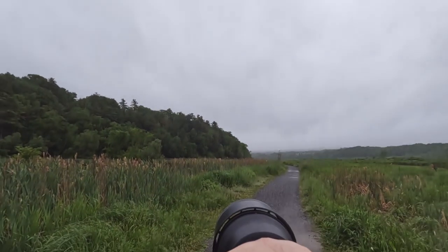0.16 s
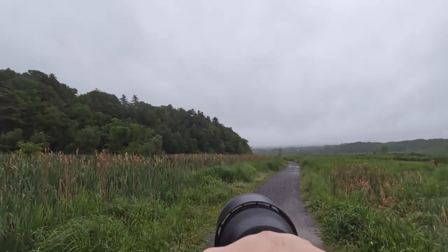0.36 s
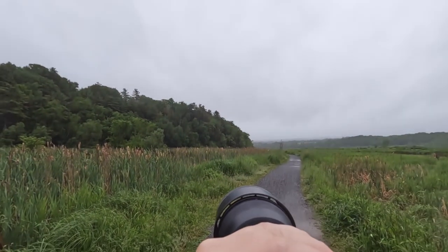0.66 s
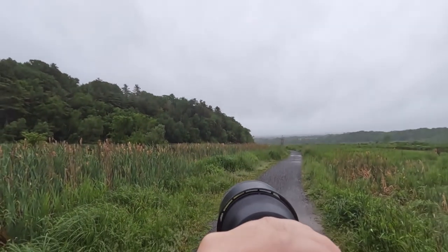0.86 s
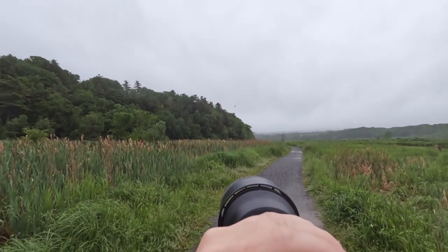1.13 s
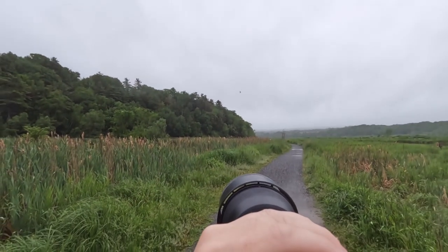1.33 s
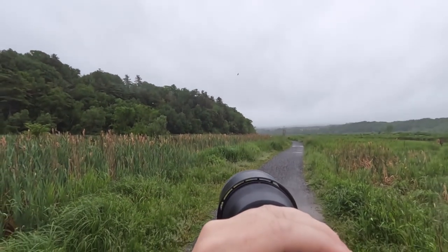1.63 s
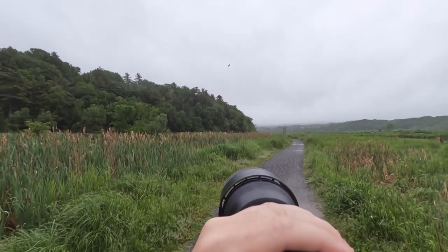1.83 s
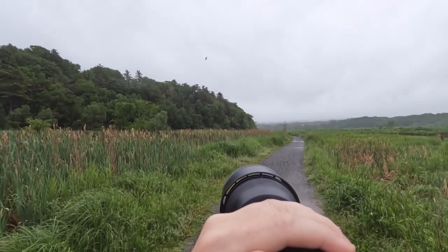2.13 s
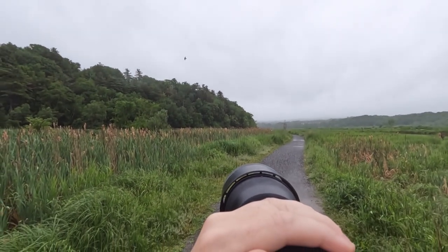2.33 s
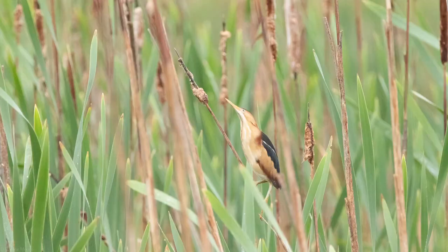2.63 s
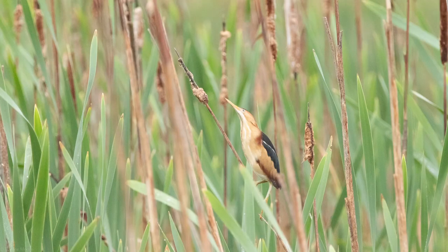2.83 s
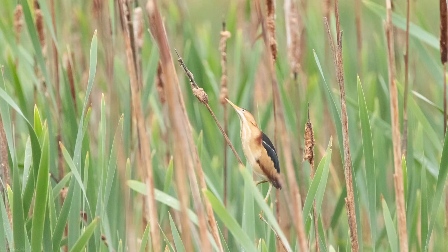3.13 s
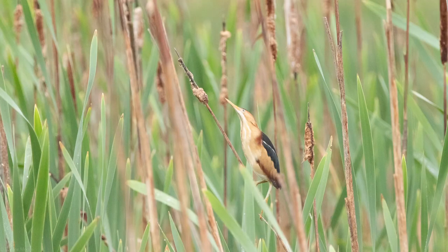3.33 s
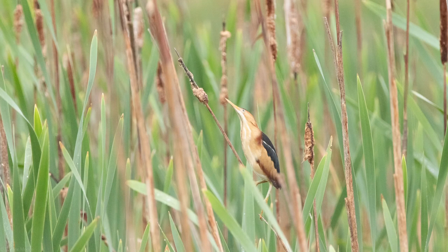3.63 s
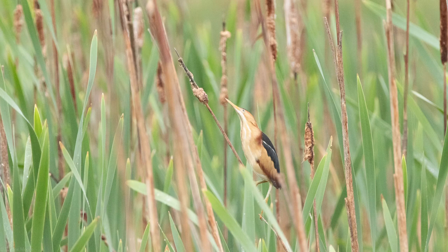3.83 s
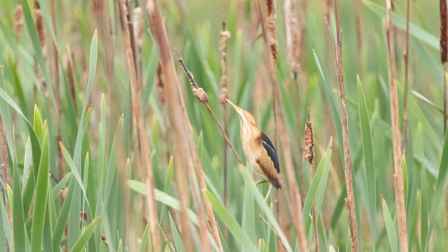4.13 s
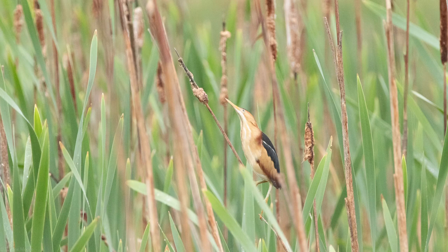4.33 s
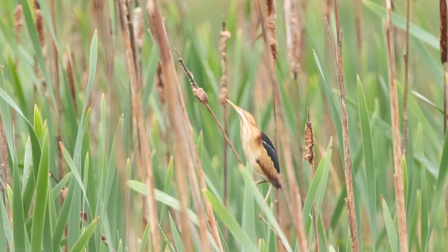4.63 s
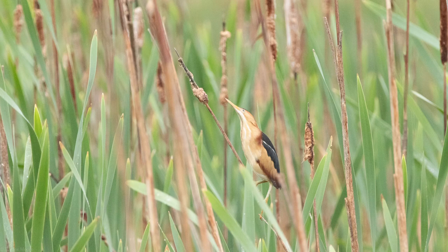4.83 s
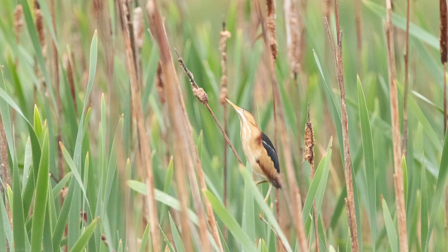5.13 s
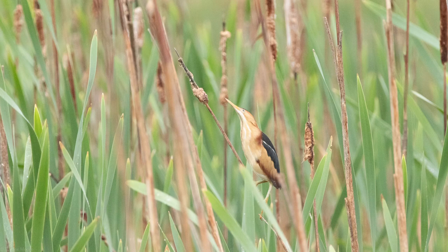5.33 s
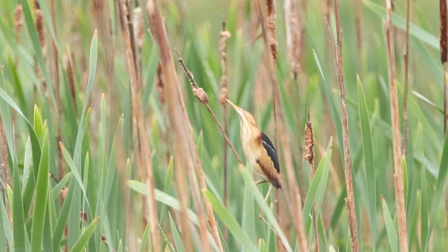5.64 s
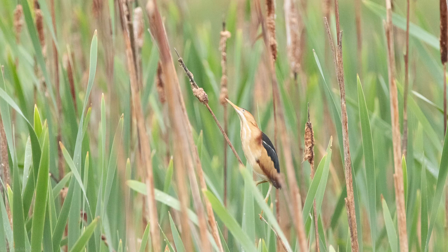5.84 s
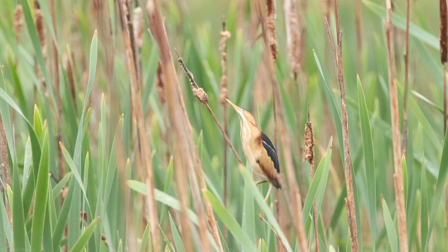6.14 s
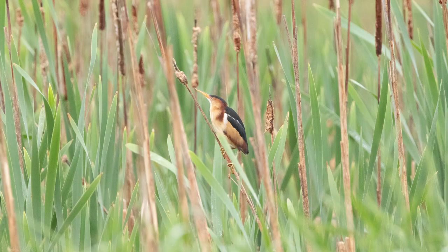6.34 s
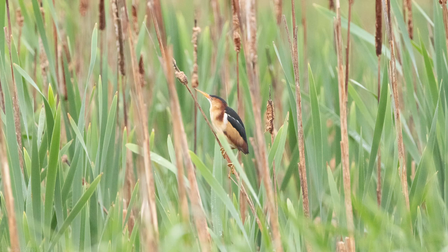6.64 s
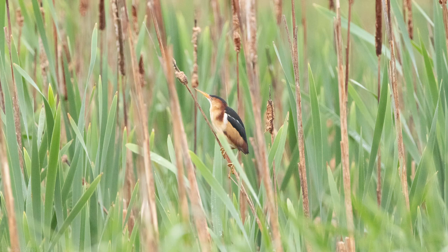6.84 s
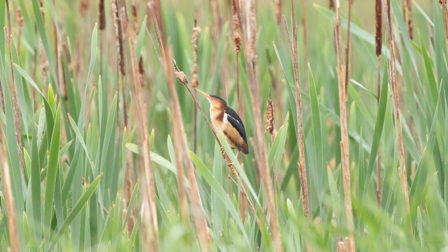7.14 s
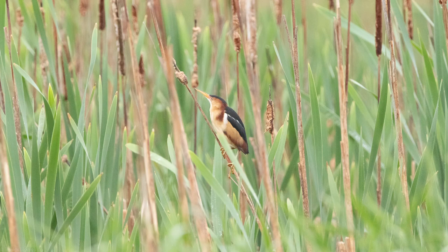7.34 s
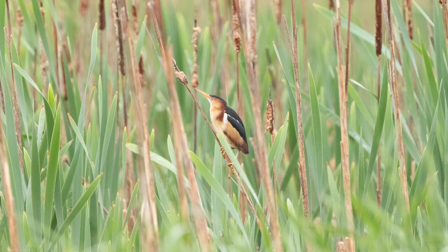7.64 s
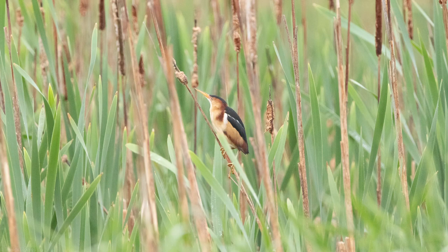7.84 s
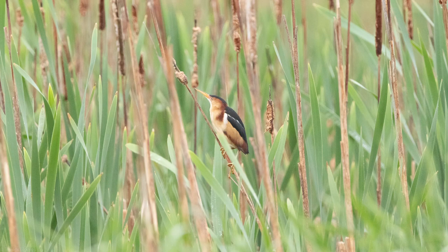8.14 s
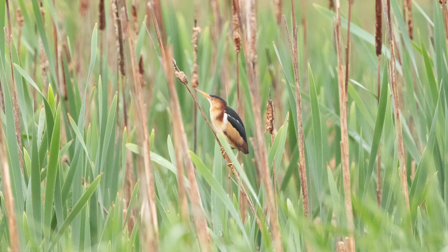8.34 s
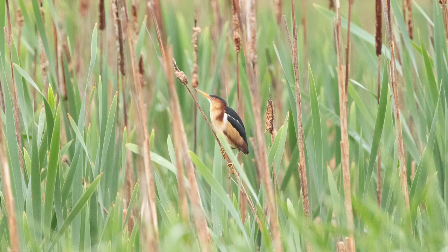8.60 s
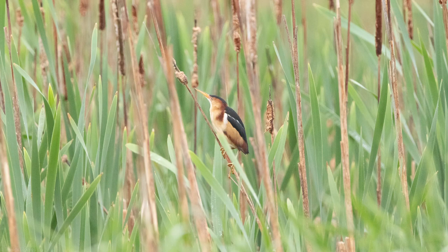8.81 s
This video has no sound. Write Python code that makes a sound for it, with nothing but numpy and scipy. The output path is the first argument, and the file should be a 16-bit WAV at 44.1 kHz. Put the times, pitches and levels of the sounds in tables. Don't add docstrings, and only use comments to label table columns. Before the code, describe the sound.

A quiet, breezy marsh with far birdsong blurred by reeds and trees. A frog's plucked twang sits on the left, opening the scene, then again at two seconds and briefly after four. A close camera fires twice, each a click followed by a fast metallic-plastic clatter and motor whirr. Blackbird trills follow each shot, a warbler repeats falling notes around five seconds, and low wind buffets thump on the microphones.

```python
import sys
import numpy as np
from scipy import signal
from scipy.fft import rfft, irfft
from scipy.io import wavfile
from scipy.ndimage import uniform_filter1d

SR = 44100
rng = np.random.default_rng(int(sys.argv[2]) if len(sys.argv) > 2 else 0)


def convert_level_to_amplitude(level_db):
    exponent = np.asarray(level_db, float) / 20
    return 10 ** exponent


def file_out(sig):
    cols = np.atleast_2d(sig).T
    lim = np.clip(cols, -1, 1)
    pcm = np.round(lim * 32767).astype(np.int16)
    wavfile.write(sys.argv[1], SR, pcm)


N = 395577

# [t/s, reeds level/dB, blackbirds level/dB, warblers level/dB]
FAR_LEVELS = [(0.0, -49.5, -62, -56.5), (0.37, -64, -67, -54), (1.0, -64, -70, -62), (1.75, -66, -75, -71),
              (2.65, -63.5, -64, -61.5), (3.3, -66, -72.5, -61), (3.72, -65.5, -76.5, -67.5),
              (4.1, -66.5, -79, -64), (4.3, -66, -67, -65), (5.3, -66.5, -72, -66),
              (6.0, -65, -69.5, -65.5), (6.62, -65.5, -64, -58.5), (7.3, -66.5, -73, -65),
              (7.82, -65.5, -75.5, -68.5), (8.5, -65.5, -74, -70), (8.97, -65, -75.5, -69.5)]


def unit(x):
    return x / np.sqrt(np.mean(x ** 2))


def seconds(length):
    return np.arange(int(length * SR)) / SR


def add(out, x, s):
    i = int(s * SR)
    out[..., i:i + x.shape[-1]] += x[..., :N - i]


def pan(x, pan_db):
    return x * convert_level_to_amplitude(np.array([[pan_db], [-pan_db]]) / 2)


def band(x, lo_hz, hi_hz, order=2):
    return signal.sosfilt(signal.butter(order, [lo_hz, hi_hz], "band", fs=SR, output="sos"), x)


def colour(points, size=1024):
    hz, db = np.transpose(points)
    bins_hz = np.arange(size // 2 + 1) * SR / size
    ceps = irfft(np.log(convert_level_to_amplitude(np.interp(np.log(bins_hz + 1), np.log(hz), db))))
    ceps[1:size // 2] *= 2
    ceps[size // 2 + 1:] = 0
    return irfft(np.exp(rfft(ceps)))


def ring(modes, scatter_db, rise):
    t = seconds(.03)
    out = 0
    for hz, width, db in modes:
        gain = convert_level_to_amplitude(db + scatter_db * rng.standard_normal((2, 1)))
        decay = np.exp(-np.pi * max(width, 90) * t)
        out = out + gain * decay * np.sin(2 * np.pi * (hz * t + rng.random()))
    out = out * (1 - np.exp(-(t / rise) ** 2))
    return out / abs(out).max()


def walk(rate):
    k = int(SR / rate)
    steps = np.repeat(rng.standard_normal(N // k + 1), k)
    return unit(uniform_filter1d(uniform_filter1d(steps, k), k)[:N])


def flicker(count, rate):
    k = int(SR / rate)
    return uniform_filter1d(uniform_filter1d(rng.standard_normal(count), k), k) * np.sqrt(1.6 * k)


def stereo_noise(likeness, count):
    mid, side = rng.standard_normal((2, count))
    c = np.clip(likeness, 0, 1)
    return (np.sqrt(1 + c) * mid + np.sqrt(1 - c) * side * np.array([[1], [-1]])) / np.sqrt(2)


def curves(rows):
    s, *columns = np.transpose(rows)
    return [np.interp(np.arange(N) / SR, s, c) for c in columns]


def note(hz, db, edge, wobble=.006, twinkle_db=3.5):
    twinkle = convert_level_to_amplitude(twinkle_db * min(hz[0] / 4000, 1) ** 2 * flicker(len(hz), 160))
    shape = signal.windows.tukey(len(hz), np.clip(edge, .05, 1)) * twinkle
    phase = 2 * np.pi * np.cumsum(hz * (1 + wobble * flicker(len(hz), 120))) / SR
    return convert_level_to_amplitude(db) * np.sqrt(2) * shape * np.sin(phase)


def reed_scatter(decay):
    t = seconds(4 * decay)
    reeds = rng.standard_normal(len(t)) * np.exp(-t / decay)
    return reeds / np.sqrt(np.sum(reeds ** 2))


def sing(out, s, hz, db, wobble=0.0058):
    voice = note(hz, db, 0.4, wobble=wobble)
    add(out, .8 * voice, s)
    add(out, .6 * signal.fftconvolve(voice, reed_scatter(.01)), s)


def fall(top_hz, length, drop):
    return top_hz * np.exp(-drop * seconds(length))


def marsh():
    # [f/Hz, level/dB per Hz]
    floor_points = [(88, -30), (150, 0), (206, -3), (298, -10.5), (374, -5), (551, -12.5), (1300, -10),
                    (2250, -20), (3800, -22.5), (5900, -29.5), (7550, -40), (10000, -58), (13000, -88),
                    (22000, -120)]
    points_hz, points_db = np.transpose(floor_points)
    layers = np.zeros((3, 2, N))
    for hz in 180 * 2 ** np.arange(0, 5.8, 1 / 3):
        db = np.interp(np.log(hz), np.log(points_hz), points_db)
        db = db + 1.5 * walk(7) + 2.0 * walk(2.5) * (hz > 1700)
        noise = band(stereo_noise(0.56, N), hz / 2 ** (1 / 6), hz * 2 ** (1 / 6), order=3)
        layers[np.searchsorted([1700, 3000], hz)] += convert_level_to_amplitude(db) * noise
    hiss = pan(unit(band(stereo_noise(0, N), 11300, 12700, order=3)) * convert_level_to_amplitude(-96.5), 6)
    reeds_db, low_song_db, chorus_db = curves(FAR_LEVELS)
    reeds = pan(unit(layers[0]) * convert_level_to_amplitude(reeds_db + 1), -1.2)
    low_song = unit(layers[1]) * convert_level_to_amplitude(low_song_db)
    high_song = pan(unit(layers[2]) * convert_level_to_amplitude(chorus_db - 5), 1.2)
    return hiss + reeds + low_song + high_song


def wind():
    # [t/s, rumble level/dB]
    gusts = [(0, -41), (1.17, -39.5), (1.5, -45.5), (2.1, -38), (2.57, -50.5), (3.8, -43.5), (4.0, -35.5),
             (4.27, -49), (4.37, -26.5), (4.95, -43.5), (5.8, -35), (5.9, -44), (6.44, -54), (7.04, -36),
             (7.7, -46.5), (8.0, -38), (8.97, -44)]
    # [t/s, peak level/dB, f/Hz]
    buffets = [(0.964, -25, 34.7), (4.34, -29.5, 64.4), (4.471, -18, 37.7), (5.513, -23, 33),
               (5.721, -16.5, 52.6), (6.786, -26, 65), (7.037, -23, 59.5), (7.422, -25.5, 53.8),
               (7.98, -20.5, 37.7), (8.728, -37, 50.5), (8.888, -30, 54.7)]
    # [t/s, peak level/dB]
    flaps = [(0.606, -38.5), (0.752, -42.5), (0.975, -38), (4.367, -38), (4.483, -17), (4.67, -34),
             (5.649, -37.5), (5.736, -35), (6.795, -43), (8.019, -45.5), (8.281, -36)]
    rumble_db, = curves(gusts)
    rumble = unit(band(stereo_noise(0.85, N), 13.9, 43.4)) * convert_level_to_amplitude(rumble_db - 1.0 + 4.6 * walk(11))
    flutter = unit(band(stereo_noise(0.093, N), 81, 197)) * convert_level_to_amplitude(0.75 * rumble_db - 34.5 + 4.4 * walk(20))
    for s, db, hz in buffets:
        t = seconds(3 / hz)
        push = np.hanning(len(t)) ** 2 * np.sin(2 * np.pi * hz * t)
        add(rumble, convert_level_to_amplitude(db - 6.5) * push, max(s - 0.29 / hz, 0))
    t = seconds(0.023)
    for s, db in flaps:
        hz = 135 * (1 + 0.03 * rng.standard_normal())
        add(flutter, convert_level_to_amplitude(db) * np.hanning(len(t)) ** 2 * np.sin(2 * np.pi * hz * t), s - .006)
    return pan(rumble + flutter, -4.5)


def hooks():
    # [t from spike/s, f/Hz]
    hook_pitch = [
        (-.06, 5140),
        (-.045, 4340),
        (-.016, 4450),
        (0, 5610),
        (.007, 4450),
        (.016, 3740),
    ]
    # [spike t/s, lead before it/s, rms level/dB]
    hook_calls = [(.005, 0.0065, -53), (.165, 0.058, -50), (5.972, 0.032, -57), (6.098, 0.068, -56),
                  (6.873, 0.07, -47)]
    out = np.zeros(N)
    for s, lead, db in hook_calls:
        t = seconds(lead + hook_pitch[-1][0])
        hz = np.interp(t - lead, *np.transpose(hook_pitch))
        buzz = 1 + .065 * np.sin(2 * np.pi * 260 * t) * (np.arange(len(hz)) < lead * SR)
        sing(out, max(s - lead, 0), uniform_filter1d(hz, size=120) * buzz, db, wobble=.015)
    return out


def frog():
    # [t/s, twang length/s, twang level/dB, tail length/s, tail level/dB]
    frog_calls = [
        (.006, 0.039, -35.5, 0.14, -43.5),
        (2.024, 0.035, -32, 0.12, -42.5),
        (4.398, .018, -35.5, 0.035, -58),
    ]
    out = np.zeros(N)
    twang_hz, tail_hz, tail_sag_hz_per_s = 171.3, 159.3, 300
    parts = []  # start, length, start Hz, end Hz, dB, sac Hz
    for s, twang, twang_db, tail, tail_db in frog_calls:
        parts.append((s, twang, twang_hz, .99 * twang_hz, twang_db, 1336))
        parts.append((s + 0.9 * twang, tail, tail_hz, tail_hz - tail_sag_hz_per_s * tail, tail_db, 1200))
    twang_max = max(row[1] for row in frog_calls)
    for s, length, start_hz, end_hz, db, sac_hz in parts:
        t = seconds(length)
        hz = end_hz + (start_hz - end_hz) * (1 - t / length) ** 1.5
        phase = 2 * np.pi * np.cumsum(hz * (1 + 0.019 * flicker(len(t), 150))) / SR
        sac_db = -150 * np.maximum(t - .03, 0)
        # Hz, width Hz, dB
        peaks = [(310, 100, -5), (520, 200, -10), (sac_hz, 130, sac_db),
                 (1850, 140, sac_db - 12.5), (2700, 300, sac_db - 39.5)]
        voice = 0
        for k in range(2, 20):
            gain = sum(convert_level_to_amplitude(p_db) / (1 + ((k * hz - f) / w) ** 4) for f, w, p_db in peaks)
            voice = voice + gain * np.sin(k * phase + .18 * k ** 2) * convert_level_to_amplitude(3.0 * flicker(len(t), 140))
        puffs = rng.standard_normal(len(t)) * (1 + np.cos(phase))
        rasp = band(puffs, 1050, 1800, order=4) * convert_level_to_amplitude(sac_db) + .5 * band(puffs, 280, 750, order=3)
        swell_db = (length > twang_max) * 5.5 * np.exp(-((t - 0.023) / .006) ** 2)
        voice = (unit(voice) + convert_level_to_amplitude(-15) * unit(rasp)) * convert_level_to_amplitude(swell_db)
        shape = np.minimum(t / 0.02, 1) * np.exp(-2.2 * np.maximum(t - .025, 0) / length)
        shape = shape * np.minimum((length - t) / 0.0028, 1)
        add(out, convert_level_to_amplitude(db) * unit(voice) * shape, s)
    return out


def chorus():
    # [t/s, top f/Hz]
    far_falls = [(.77, 7700), (3.32, 6580), (3.49, 6760), (3.63, 6020), (3.67, 7000), (3.86, 6020),
                 (4.075, 6040), (4.71, 7540)]
    # [t/s, length/s, f/Hz, rms level/dB]
    held_calls = [(0.04, 0.041, 2500, -70), (.51, 0.093, 2080, -74.5), (0.951, 0.14, 3954, -75),
                  (1.3, 0.062, 3850, -72.5), (1.41, 0.18, 3830, -81), (1.605, 0.038, 5800, -85),
                  (1.745, 0.028, 5770, -75), (1.87, 0.032, 5820, -79.5), (1.91, 0.051, 6400, -78),
                  (1.86, .13, 3330, -81.5), (1.985, 0.047, 5800, -79.5), (2.1, .04, 5820, -82),
                  (2.162, 0.074, 5400, -73.5), (1.565, .03, 1960, -74), (3.62, .06, 4100, -81),
                  (3.74, 0.12, 3310, -77), (3.94, 0.062, 3950, -74), (4.03, .1, 3250, -73.5),
                  (5.555, 0.03, 1697, -70.5), (7.37, 0.053, 2010, -73.5), (7.91, 0.029, 4050, -76.5)]
    blur, clear = np.zeros((2, N))
    for s, length, pitch, steepness, size in rng.random((260, 5)):
        sweep = np.linspace(1, .9 - .4 * steepness, int((.015 + .04 * length) * SR))
        add(blur, note((3000 + 4200 * pitch) * sweep, -17 + 6 * size, .8), s * N / SR)
    for s, top_hz in far_falls:
        add(clear, note(np.linspace(top_hz, .78 * top_hz, int(0.042 * SR)), -74, 0.42), s)
    for s, length, hz, db in held_calls:
        wobble = .003 + .012 * (3000 < hz < 3500)
        add(clear, note(np.full(int(length * SR), hz), db, 0.4, wobble=wobble), s)
    return blur * convert_level_to_amplitude(curves(FAR_LEVELS)[2]) + clear


def rubs():
    # [t/s, length/s, rms level/dB]
    grip_rubs = [(0.198, 0.084, -55), (.895, 0.069, -63), (1.094, .17, -58), (4.342, 0.1, -61.5),
                 (4.468, 0.052, -59), (4.656, 0.052, -60.5)]
    out = np.zeros((2, N))
    for s, length, db in grip_rubs:
        count = int(length * SR)
        slip_db = 2.3 * rng.exponential(size=count) + 5.4 * flicker(count, 120)
        slips = stereo_noise(0.41, count) * convert_level_to_amplitude(slip_db)
        add(out, convert_level_to_amplitude(db) * unit(band(slips, 810, 2570)) * signal.windows.tukey(count, .5), s)
    return out


def handling():
    # [t/s, peak level/dB, treble level/dB]
    finger_ticks = [(0.203, -24.5, -25), (0.208, -32.5, -8), (0.215, -36, -20), (0.223, -37, -15),
                    (0.234, -41, -28), (0.254, -41, -18), (0.259, -38.5, -32), (0.281, -37, -21),
                    (0.919, -42.5, -31), (0.949, -46, -27), (0.905, -50, -25), (0.935, -46, -25),
                    (0.965, -51, -25), (1.111, -40.5, 4.5), (1.13, -44, -7), (1.165, -38, -4),
                    (1.188, -38, -8), (1.222, -39.5, -30), (1.251, -41, -9), (1.708, -35.5, -11.5),
                    (4.346, -50, -25), (4.376, -40, -23.5), (4.388, -47.5, -25), (4.439, -45, -11),
                    (4.475, -44, -26), (4.489, -46, -19), (4.508, -45, -22), (4.525, -52, -24),
                    (4.674, -36.5, -26), (4.702, -48, -25), (6.651, -42, 1.5), (7.654, -42, -7.5),
                    (7.912, -56, 1), (8.399, -50.5, -2)]
    # [f/Hz, width/Hz, level/dB]
    dull_modes = [(960, 274, 3), (1400, 180, -2), (1900, 630, 10.5), (2790, 185, -8)]
    out = np.zeros((2, N))
    t = seconds(0.039)
    for s, db, treble_db in finger_ticks:
        crack = unit(band(stereo_noise(0.71, len(t)), 3100, 8100, order=3)) * np.exp(-t / 0.0025)
        grains = rng.standard_normal(len(t)) * (rng.random(len(t)) < .04)
        grains = grains * np.exp(-t / 0.0047) * np.minimum(0.67 + t / 0.0045, 1)
        grains[0] = 0.59
        tick = signal.fftconvolve(ring(dull_modes, 3, 0.00045), grains[None], axes=1)
        add(out, convert_level_to_amplitude(db) * tick / abs(tick).max(), s)
        add(out, convert_level_to_amplitude(db + treble_db - 10.5) * crack, s)
    return out


def buzzes():
    # [t/s, length/s, f/Hz, beats per s, rms level/dB]
    wide_buzzes = [
        (0.241, 0.072, 4430, 90, -51.5),
        (6.377, 0.062, 5110, 350, -57),
        (8.777, 0.12, 5660, 150, -53.5),
    ]
    # [t/s, length/s]
    narrow_throbs = [(8.059, 0.2), (8.405, 0.202)]
    out = np.zeros(N)
    # start, length, Hz, swing Hz, beats a second, dB
    calls = [(s, length, hz, 0.11 * hz, rate, db) for s, length, hz, rate, db in wide_buzzes]
    calls += [(s, length, 3730, 60, 140, -58) for s, length in narrow_throbs]
    for s, length, centre_hz, swing_hz, rate, db in calls:
        t = seconds(length)
        beat = 2 * np.pi * rate * t + swing_hz / 900 * flicker(len(t), 40)
        swing = swing_hz * np.minimum(t / 0.046, 1)
        throb = 1 + 0.69 * np.exp(-swing_hz / 300) * np.cos(beat)
        tone = note(centre_hz + swing * np.sin(beat), db, 0.39, wobble=0.0047, twinkle_db=-1.0)
        add(out, tone * throb * np.exp(-3.0 * t * swing_hz / 650), s)
    return out


def level_notes(notes):
    out = np.zeros(N)
    for s, length, hz, db in notes:
        sing(out, s, hz * (1 - .04 * np.exp(-seconds(length) / .012)), db, wobble=.003)
    return out


def trills():
    # [t/s, length/s, bottom f/Hz, beats per s, stroke level/dB, held level/dB, smeared share 0-1]
    blackbird_trills = [
        (0.331, .45, 3500, 59, -58, -73, 0.44),
        (2.638, 0.39, 2863, 40, -63, -59, 0.8),
        (2.817, 0.091, 3310, 60, -57.5, -73.5, 0.6),
        (6.586, .432, 2678, 64, -50.5, -59, 0.42),
    ]
    out = np.zeros(N)
    top_hz, slowing, smear_s = 5335, 0.27, 0.013
    for s, length, bottom_hz, rate, db, held_db, smear in blackbird_trills:
        t = seconds(length)
        beat = (rate * t * (1 - slowing * t / 2) + .03 * flicker(len(t), 30)) % 1
        high = np.clip(beat / .3, 0, 1)
        low = np.clip((beat - .3) / (.95 - .3), 0, 1)
        mid_hz = .5 * (bottom_hz + top_hz)
        high_hz = top_hz - (top_hz - .86 * mid_hz) * high
        low_hz = bottom_hz + (mid_hz - bottom_hz) * (1 - low) ** 1.3
        song = note(high_hz, db + 1.5, .06, wobble=.015) * np.sin(np.pi * high ** 1.3)
        song += note(low_hz, db, .06, wobble=.015) * np.sin(np.pi * low ** .8)
        song += note(5250 - 350 * beat, db - 4.5, 0.057, wobble=.02) * np.sin(np.pi * beat) ** 2
        held = note(bottom_hz * (1.03 - .04 * beat), held_db, .08, wobble=.02)
        song += held * (.15 + 1.16 * np.sin(np.pi * beat) ** 2)
        share = np.clip(smear, 0, 1)
        add(out, np.sqrt(1 - share) * song, s)
        add(out, np.sqrt(share) * signal.fftconvolve(song, reed_scatter(smear_s)), s)
    return out


def warbler():
    # [t/s, arch f/Hz, fall level/dB, arch level/dB]
    lead_ins = [
        (4.71, 5750, -78, -67),
        (4.885, 5840, -67, -59),
        (5.056, 5640, -63, -55),
    ]
    # [t/s, top f/Hz, length/s, rms level/dB]
    single_falls = [(0.444, 7100, 0.027, -62), (0.629, 7720, 0.038, -63), (0.689, 3740, 0.035, -63),
                    (0.914, 7600, 0.055, -63), (2.243, 3900, 0.028, -72.5), (2.33, 3860, 0.022, -57),
                    (7.298, 6950, 0.049, -69)]
    # [t/s, length/s, start f/Hz, end f/Hz, rms level/dB]
    slides = [(1.027, .025, 3400, 4500, -68), (1.061, 0.063, 4190, 6300, -68),
              (1.133, 0.031, 3800, 2700, -73), (4.505, .05, 3420, 3570, -74.5),
              (0.765, 0.039, 2570, 3660, -60), (3.534, 0.054, 2790, 4110, -67.5),
              (4.451, 0.053, 2490, 3130, -62.5), (4.808, 0.056, 2810, 2450, -60),
              (4.896, .12, 2465, 2580, -60), (5.765, 0.094, 2510, 2360, -63),
              (5.486, 0.035, 2590, 3180, -58), (5.533, 0.047, 3000, 2530, -57.5),
              (5.805, 0.069, 3650, 4380, -67.5), (5.862, 0.077, 4360, 7100, -65),
              (5.721, 0.045, 2160, 2460, -70), (5.834, 0.13, 2196, 1960, -70),
              (1.374, .04, 3010, 2700, -74), (1.516, 0.034, 2210, 2000, -71), (1.958, .05, 6200, 5400, -77),
              (2.141, .11, 3360, 3700, -75.5), (3.245, .02, 3500, 4800, -73),
              (3.363, 0.047, 4300, 5400, -68), (3.385, .03, 3200, 3900, -68),
              (3.737, .04, 3190, 4300, -72.5), (4.001, 0.036, 3900, 2980, -69),
              (4.017, 0.016, 6900, 7500, -74.5), (7.9, 0.01, 6240, 5600, -68.5),
              (8.05, .025, 4600, 3900, -76), (8.645, .014, 5800, 7100, -69),
              (6.516, 0.037, 2350, 2910, -51.5), (6.944, 0.071, 7500, 5800, -69.5),
              (7.088, 0.091, 8100, 6340, -72), (7.232, 0.074, 4860, 6900, -70)]
    out = np.zeros(N)
    drop_per_s, arch_s = 9.2, 0.0518
    for s, hz, fall_db, arch_db in lead_ins:
        sing(out, s, fall(8150, .027, 27), fall_db)
        sing(out, s + 0.038, hz * (1 - 0.32 * (seconds(arch_s) / arch_s - .6) ** 2), arch_db)
    for k in range(5):
        sing(out, 5.212 + k * .1178, fall(7360, 0.062, drop_per_s), -56.5)
    for s, hz, length, db in single_falls:
        sing(out, s, fall(hz, length, drop_per_s), db)
    for s, length, start_hz, end_hz, db in slides:
        sing(out, s, fall(start_hz, length, np.log(start_hz / end_hz) / length), db)
    return out


def tchips():
    # [t/s, rms level/dB]
    arched_chips = [(1.186, -59.5), (3.458, -58.5), (4.336, -60), (5.368, -59), (7.587, -59), (8.584, -61)]
    out = np.zeros(N)
    length = .03
    arch = np.polyfit([0, .5, 1], (3690, 3966, 3250), deg=2)
    for s, db in arched_chips:
        hz = np.polyval(arch, seconds(length) / length)
        sing(out, s, hz, db)
        sing(out, s, hz - 480, db - 6.5)
        sing(out, s, hz / 2, db - 13.5)
    return out


def shutter():
    # [t/s, peak level/dB]
    presses = [
        (2.321, -10.5),
        (6.132, -10.5),
    ]
    releases = [2.383, 6.1497]
    # [t after release/s, blow level/dB, rattle level/dB, rattle decay/s]
    strikes = [(0, -31, -30.5, .008), (.0065, -29.5, -27.5, 0.026), (.022, -43, -33.5, .008),
               (0.0325, -19.5, -20, 0.0058), (0.0408, -22.5, -24.5, 0.0046), (0.0609, -31.5, -23, 0.013),
               (0.0663, -23, -8.5, 0.0022), (0.0701, -15, -20.5, .003), (0.0776, -28.5, -28, 0.0096),
               (0.0843, -33.5, -28, .006), (0.0943, -32.5, -26, .004), (.0972, -24, -16.5, .005),
               (.1, -23, -22, .006), (.105, -24.5, -24, 0.012), (.113, -32, -26, 0.01),
               (.124, -27.5, -31.5, 0.015)]
    # [f/Hz, level/dB per Hz]
    shell_points = [(150, -34), (250, -1), (427, -9.5), (669, -2.5), (837, -9), (913, -3.5), (1100, -7),
                    (1330, -0.5), (2130, -4), (2280, -1.5), (5790, -1.5), (12200, -24), (15500, -51)]
    # [f/Hz, width/Hz, level/dB]
    body_modes = [(1960, 33, 5.5), (2520, 49, 3.5), (3700, 83, 6), (4330, 130, -9.5), (4930, 170, 2.5),
                  (5470, 230, 1), (6380, 79, -7), (9400, 200, -12.5), (12470, 200, -21.5)]
    button_modes = [(1380, 264, -8.5), (2590, 266, -5), (3690, 310, -14), (5400, 960, 8),
                    (7000, 540, -10.5), (9200, 1200, -21)]
    out = np.zeros((2, N))
    t = seconds(0.37)
    shell = colour(shell_points)
    shell = shell / np.sqrt(np.sum(shell ** 2))
    thud = np.sin(2 * np.pi * 330 * t) * np.exp(-t / 0.0042)
    thud += 0.58 * np.sin(2 * np.pi * 200 * t) * np.exp(-t / 0.0072)
    thud += 3.0 * np.sin(2 * np.pi * 75 * t) * np.exp(-t / 0.012)
    for start in releases:
        force = np.zeros((2, N))
        for s, blow_db, rattle_db, decay in strikes:
            knocks = unit(convert_level_to_amplitude(3.0 * rng.exponential(size=len(t))))
            rattle = convert_level_to_amplitude(rattle_db) * stereo_noise(.78, len(t)) * knocks
            rattle = rattle * np.exp(-t / decay) * np.minimum(t / .001, 1)
            rattle[:, 0] += 3.2 * convert_level_to_amplitude(blow_db)
            add(force, rattle * convert_level_to_amplitude(1.0 * rng.standard_normal()), start + s)
            add(out, pan(convert_level_to_amplitude(blow_db - 14.5) * thud, -6.5), start + s)
        force *= np.interp(np.arange(N) / SR, [start + 0.12, start + 0.16], [1, .03])
        near = slice(int(start * SR), int((start + .5) * SR))
        modes = signal.fftconvolve(force[:, near], convert_level_to_amplitude(-24.0) * ring(body_modes, 2.0, 0.00028), axes=1)
        add(out, modes, start)
        direct = signal.fftconvolve(force[:, near], shell[None], axes=1)
        direct[0] += 0.79 * band(direct[0], 9000, 15000)
        add(out, direct, start)
    out *= convert_level_to_amplitude(1.5)
    for s, db in presses:
        add(out, pan(convert_level_to_amplitude(db) * ring(button_modes, 1, 0.00032), -4.0), s + 0.00025)
    return out


def gurgle():
    # [t/s, length/s, f/Hz, list of (partial number, level/dB)]
    gurgle_call = (6.538, .052, 845, [(2, -66), (3, -57), (4, -52), (5, -53), (6, -50), (8, -78)])
    out = np.zeros(N)
    s, length, hz, partials = gurgle_call
    for k, db in partials:
        late = .003 * (k - 4)
        t = seconds(length - late)
        tone = note(k * hz * (1 + .03 * np.exp(-t / .012)), db, .45, twinkle_db=1.2)
        add(out, tone * np.exp(-t / .1), s + late)
    return out


def thin_chips():
    chip_times = [7.995, 8.09, 8.185, 8.28, 8.385, 8.53, 8.71, 8.93]
    out = np.zeros(N)
    for s in chip_times:
        add(out, note(np.linspace(8300, 7600, int(0.033 * SR)), -81, 0.55, wobble=0.025), s)
    return out


def echo(x):
    t = seconds(0.89)
    tail = stereo_noise(0.86, len(t)) * convert_level_to_amplitude(-60 * t / .6) * np.minimum(t / 0.003, 1)
    tail = tail / np.sqrt(np.sum(tail ** 2) / 2)
    return convert_level_to_amplitude(-.5) * signal.fftconvolve(x[None], tail, axes=1)[:, :N]


def scene():
    # [t/s, length/s, f/Hz, rms level/dB]
    whistles_left = [(.56, 0.25, 3660, -74), (2.28, 0.16, 1255, -46), (2.573, 0.022, 2510, -59.5),
                     (2.611, 0.018, 3650, -51.5), (2.62, 0.031, 1562, -54), (2.745, 0.04, 2350, -49.5),
                     (2.749, 0.025, 2070, -51), (2.835, 0.021, 1900, -58), (2.84, 0.022, 3750, -54.5),
                     (4.495, .05, 4810, -70.5), (4.52, .05, 2670, -68.5), (2.863, 0.034, 1470, -58),
                     (3.16, 0.046, 1448, -62), (4.122, 0.14, 1525, -69)]
    whistles_ahead = [(.328, 0.18, 3670, -68), (1.45, .095, 5400, -70.5), (1.54, 0.036, 5050, -73),
                      (1.782, 0.093, 5400, -70), (6.31, 0.026, 1766, -49), (6.452, 0.068, 1228, -55)]
    whistles_right = [(.768, 0.22, 3930, -70.5), (1.895, 0.06, 7120, -68.5), (2.165, 0.074, 7120, -68),
                      (2.51, 0.056, 7100, -74), (2.627, .17, 5300, -69), (3.012, 0.25, 5240, -71),
                      (4.889, 0.084, 3213, -60), (6.432, 0.018, 2520, -55.5), (8.659, 0.052, 7300, -59.5)]
    near = level_notes(whistles_left) + hooks()
    ahead = level_notes(whistles_ahead)
    right = tchips() + level_notes(whistles_right)
    rough = trills() + buzzes() + gurgle() + thin_chips()
    left, twang, distant = warbler(), frog(), chorus()
    sides = [(left + near, 4.2), (ahead, .3), (right, -4.2), (rough, -.4), (twang, 6.5), (distant, 1.5)]
    animals = sum(pan(x[None], db) for x, db in sides)
    sent = left + convert_level_to_amplitude(-6) * (ahead + near) + convert_level_to_amplitude(-3) * right
    sent = sent + convert_level_to_amplitude(4) * distant + convert_level_to_amplitude(-7) * rough + convert_level_to_amplitude(-11) * twang
    return shutter() + handling() + rubs() + animals + echo(sent) + wind() + marsh()


def low_pass(x):
    return signal.sosfilt(signal.butter(12, 15740, fs=SR, output="sos"), x)


def record(dry):
    top = signal.ellip(8, .2, 60, 15100, fs=SR, output="sos")
    rounded = 0.52 * np.tanh(dry / 0.47)
    return low_pass(signal.sosfilt(top, rounded))


dry = scene()
out = record(dry)
file_out(out)
```